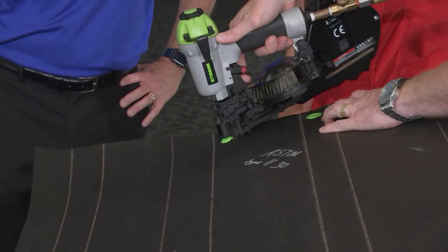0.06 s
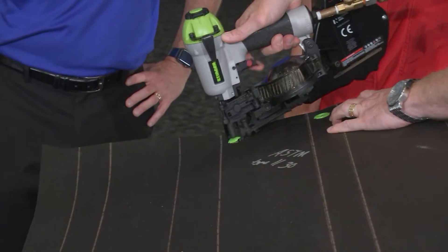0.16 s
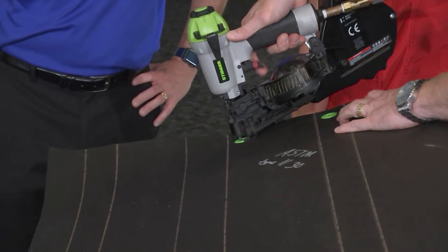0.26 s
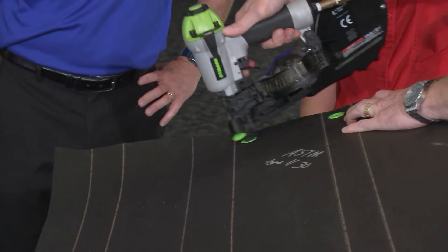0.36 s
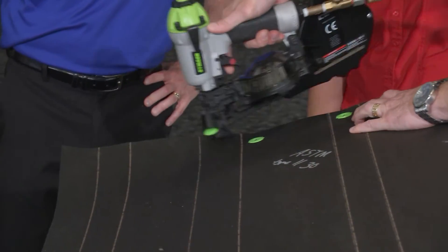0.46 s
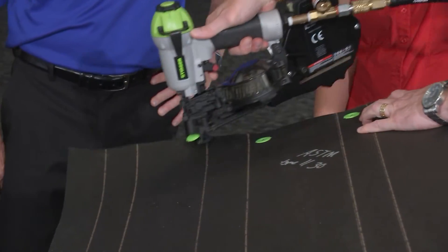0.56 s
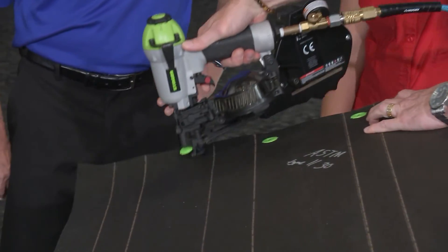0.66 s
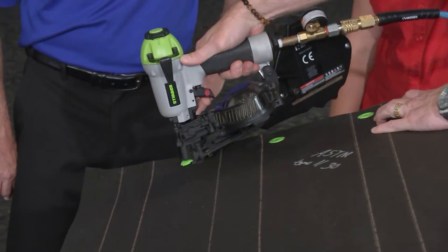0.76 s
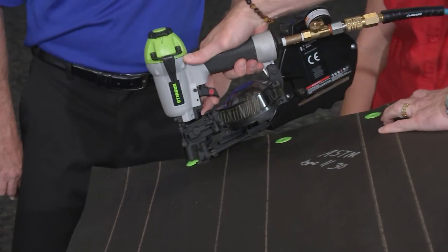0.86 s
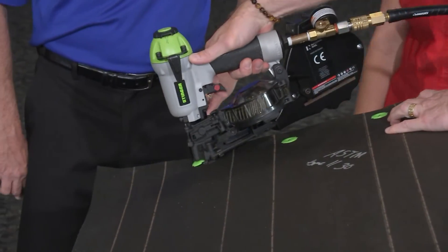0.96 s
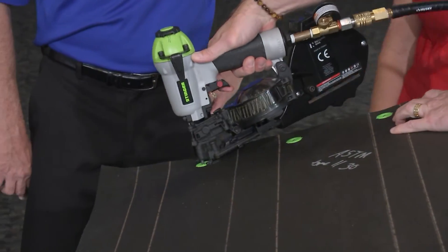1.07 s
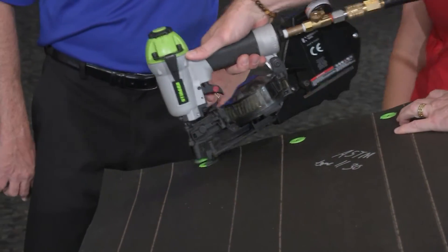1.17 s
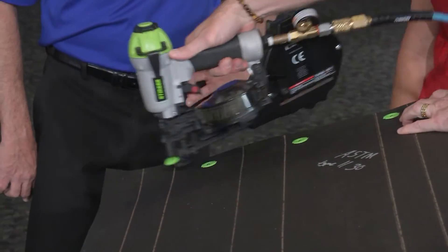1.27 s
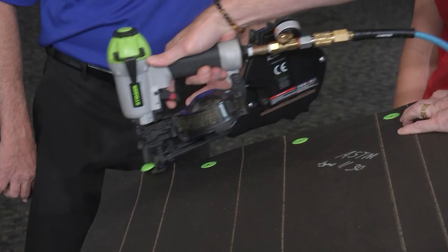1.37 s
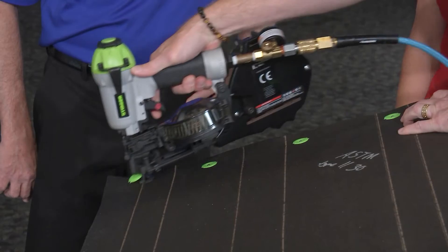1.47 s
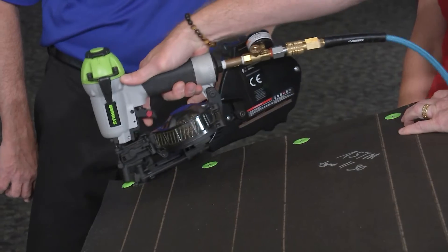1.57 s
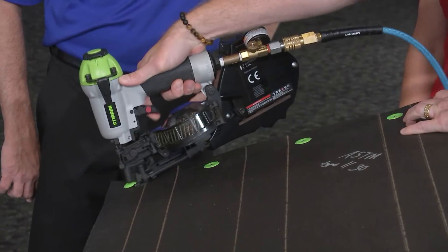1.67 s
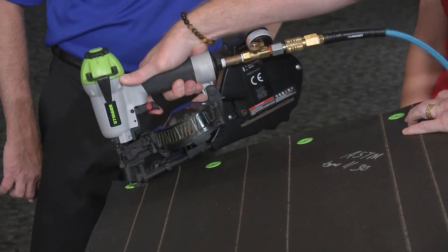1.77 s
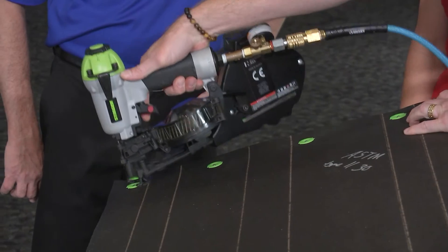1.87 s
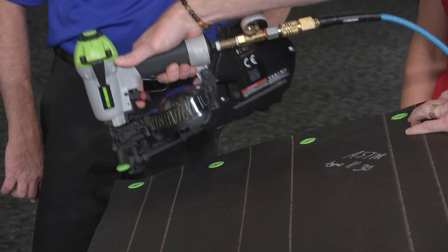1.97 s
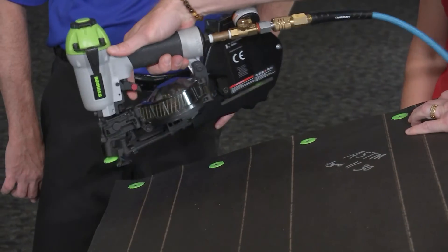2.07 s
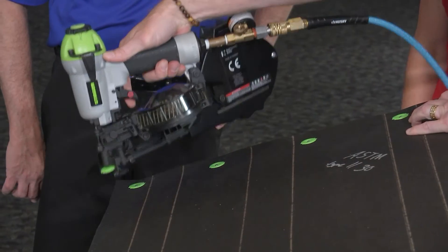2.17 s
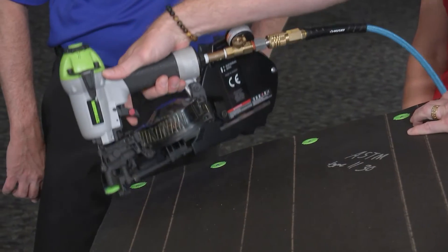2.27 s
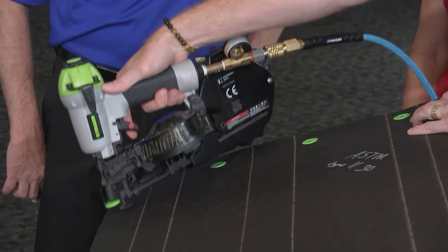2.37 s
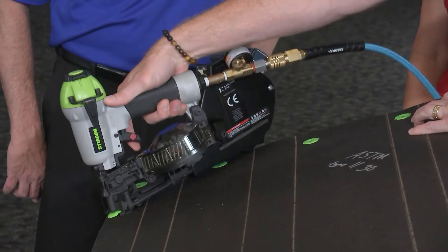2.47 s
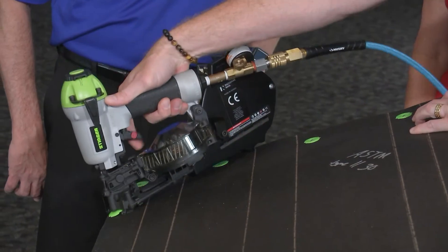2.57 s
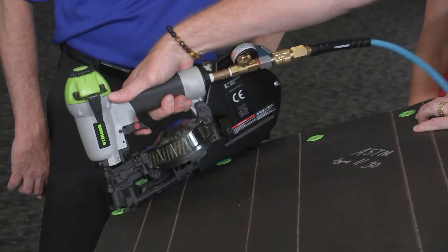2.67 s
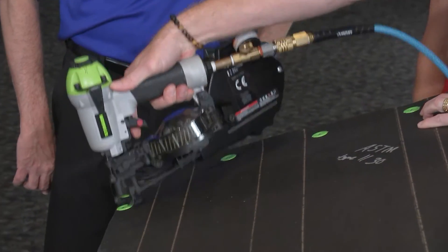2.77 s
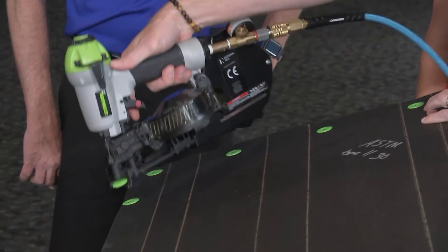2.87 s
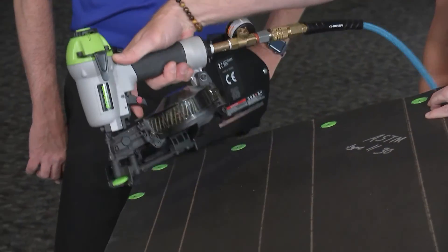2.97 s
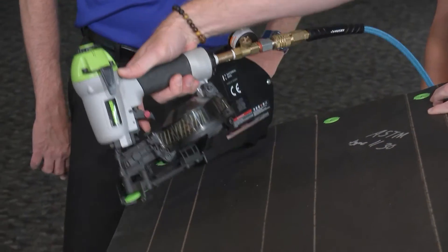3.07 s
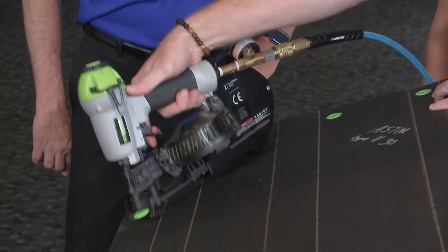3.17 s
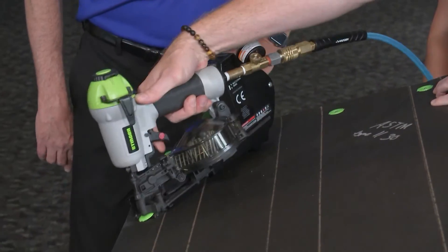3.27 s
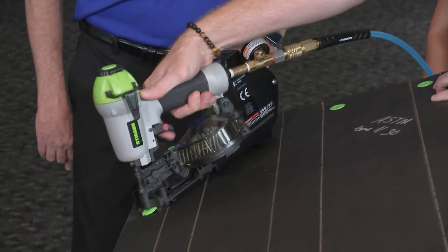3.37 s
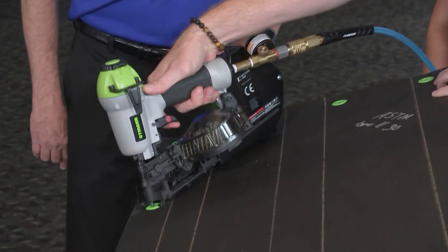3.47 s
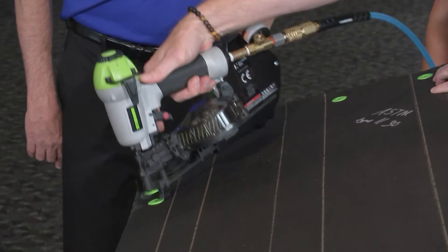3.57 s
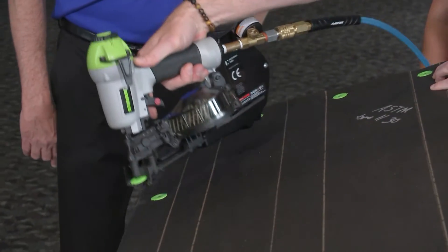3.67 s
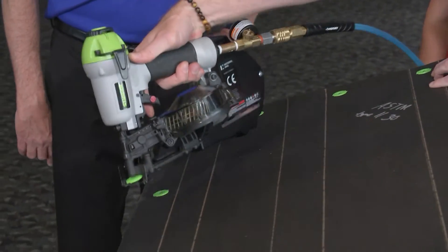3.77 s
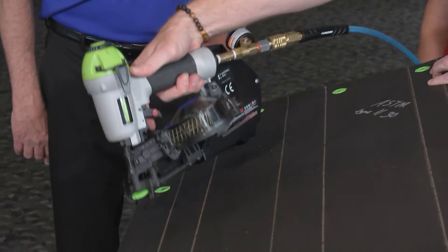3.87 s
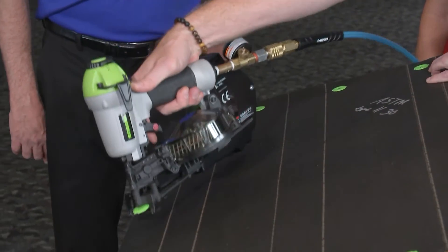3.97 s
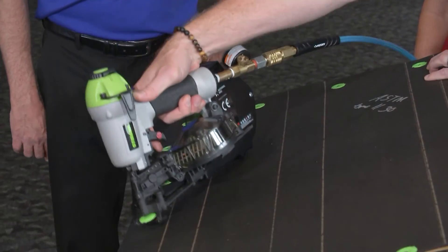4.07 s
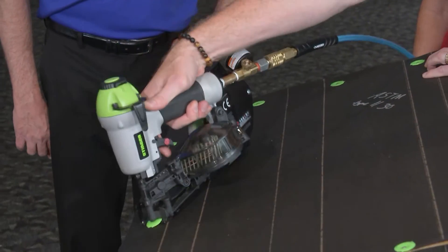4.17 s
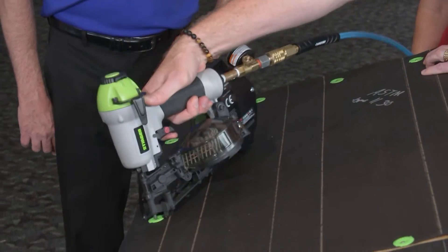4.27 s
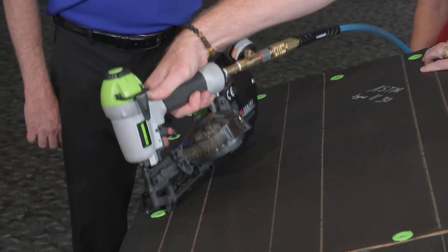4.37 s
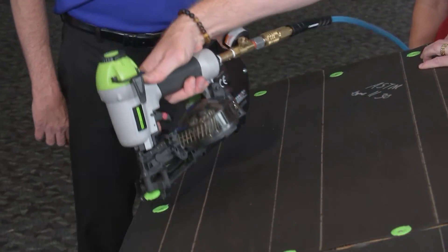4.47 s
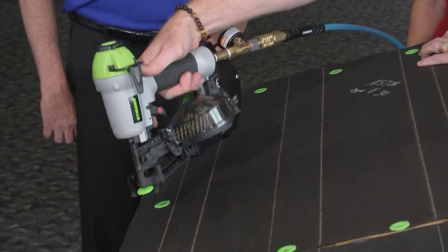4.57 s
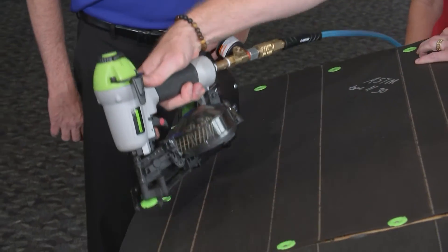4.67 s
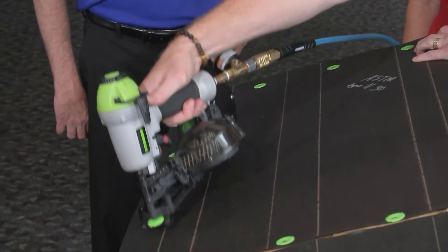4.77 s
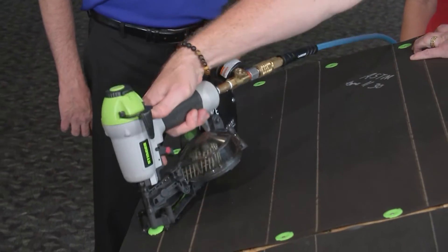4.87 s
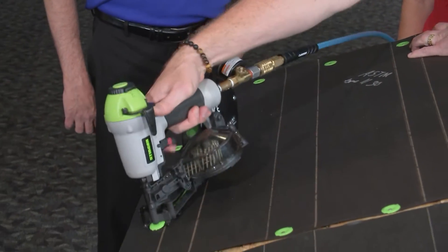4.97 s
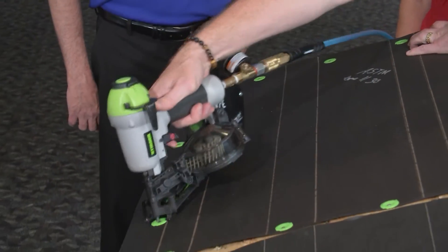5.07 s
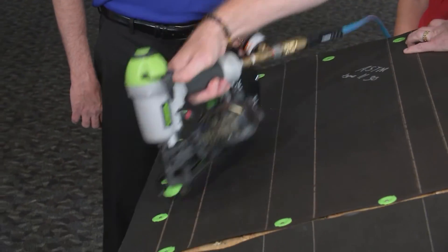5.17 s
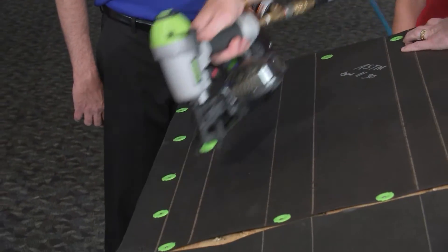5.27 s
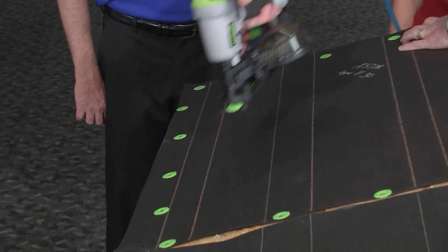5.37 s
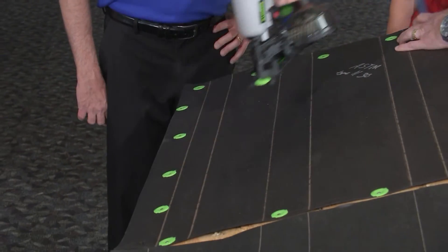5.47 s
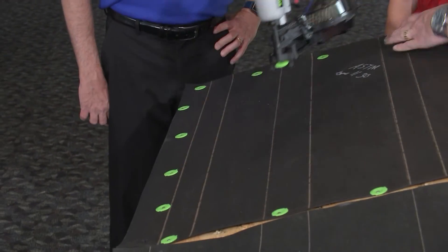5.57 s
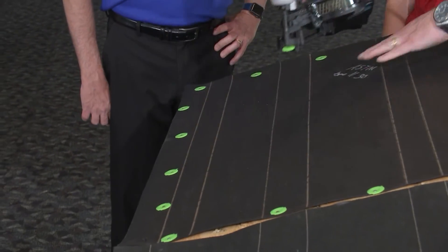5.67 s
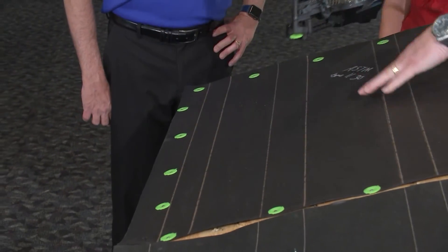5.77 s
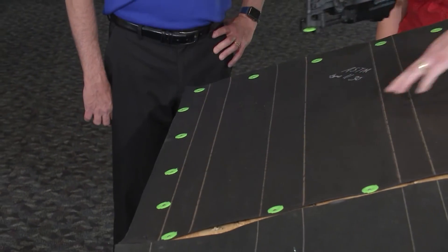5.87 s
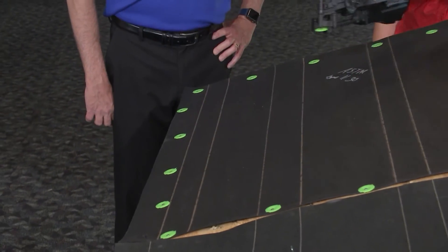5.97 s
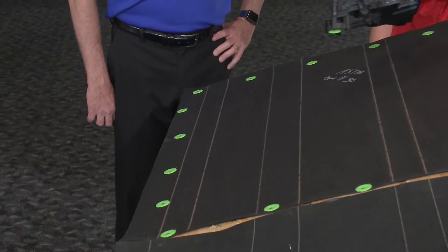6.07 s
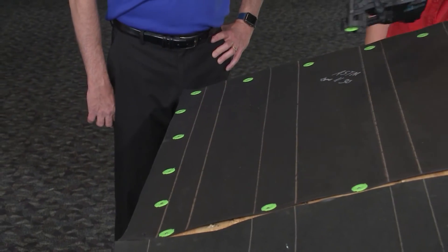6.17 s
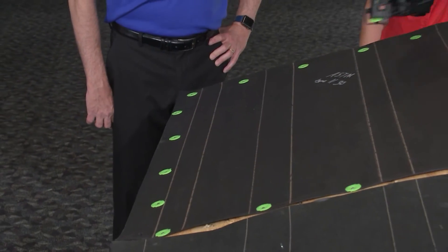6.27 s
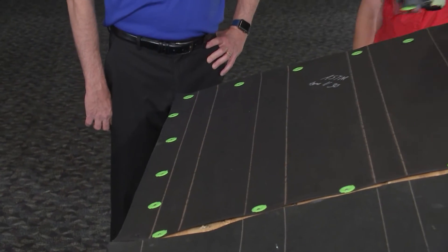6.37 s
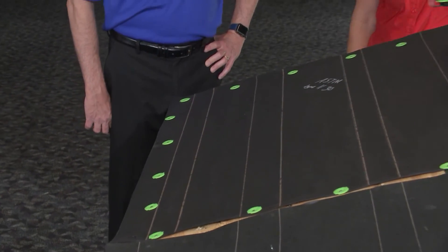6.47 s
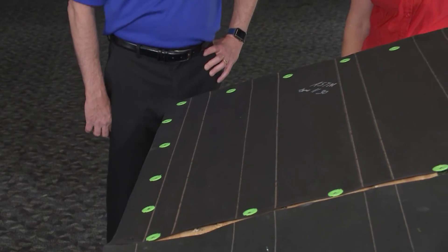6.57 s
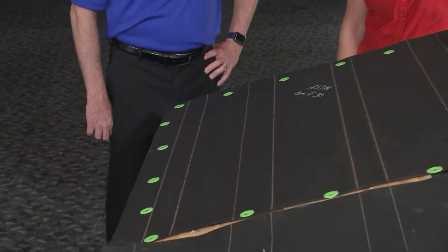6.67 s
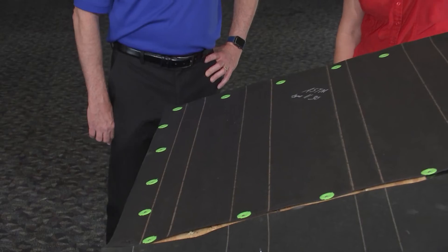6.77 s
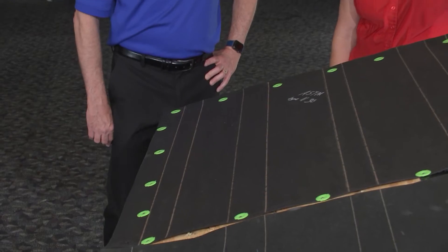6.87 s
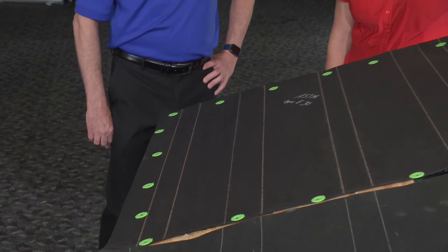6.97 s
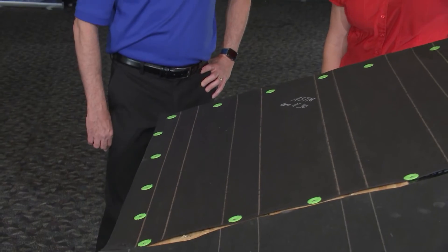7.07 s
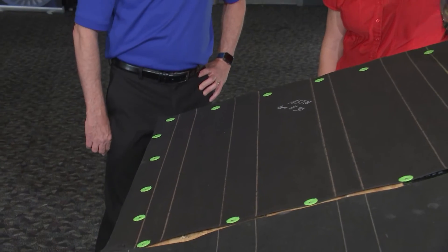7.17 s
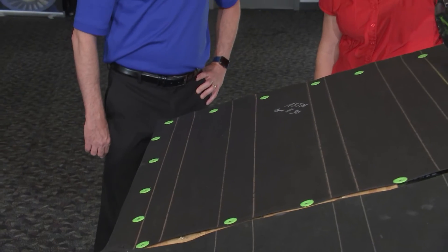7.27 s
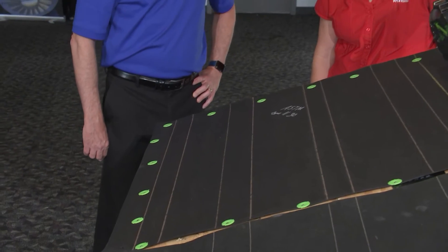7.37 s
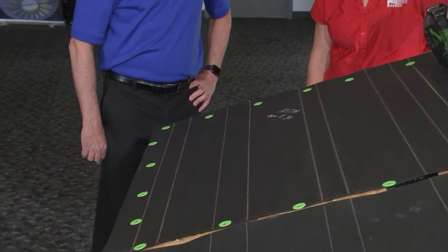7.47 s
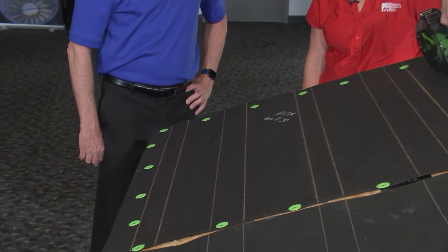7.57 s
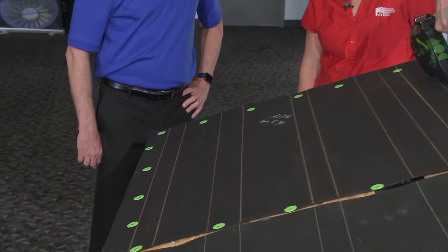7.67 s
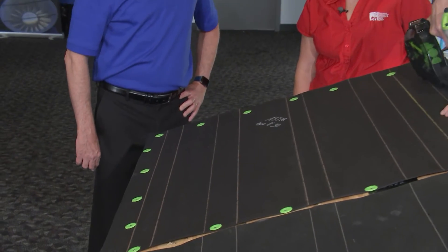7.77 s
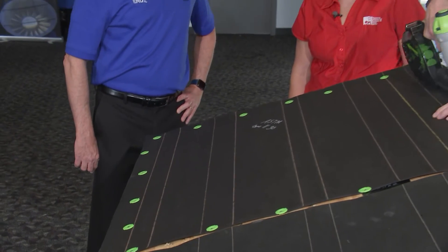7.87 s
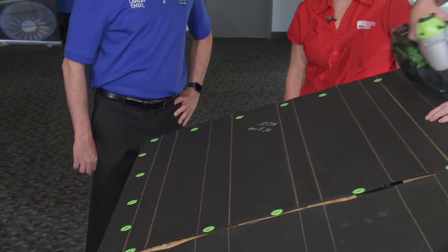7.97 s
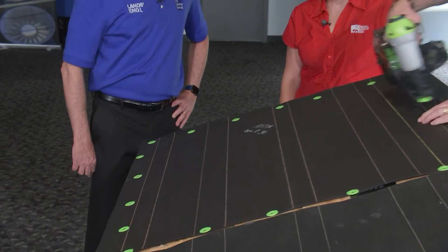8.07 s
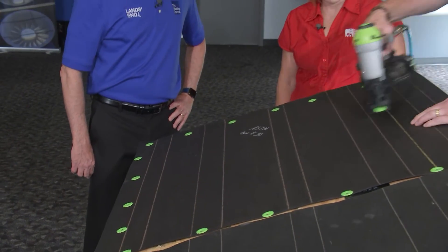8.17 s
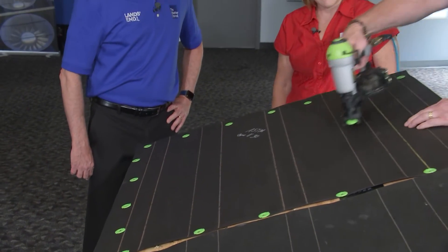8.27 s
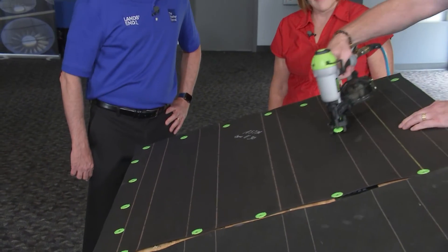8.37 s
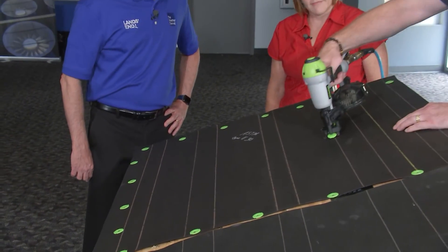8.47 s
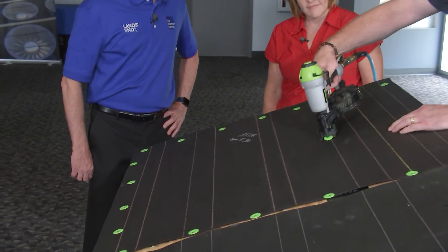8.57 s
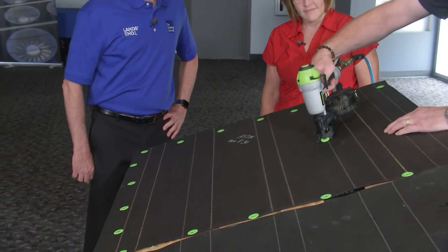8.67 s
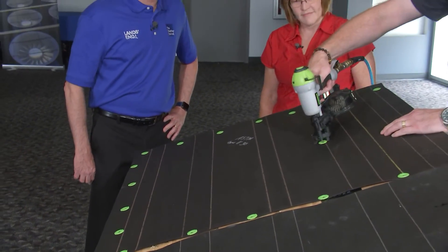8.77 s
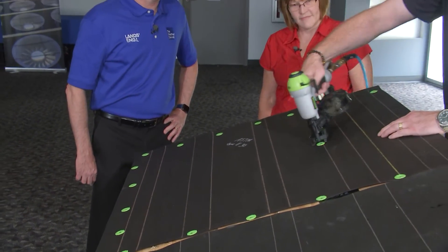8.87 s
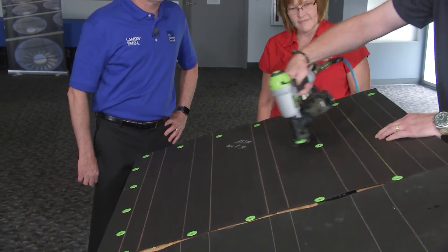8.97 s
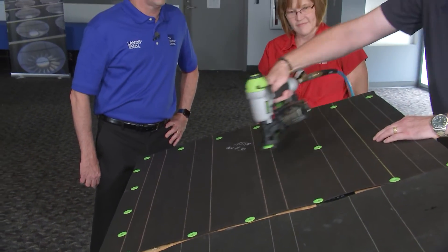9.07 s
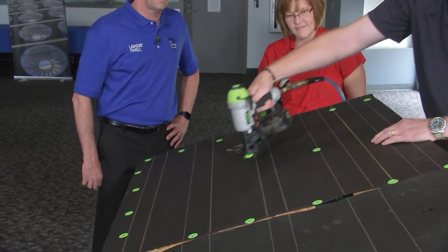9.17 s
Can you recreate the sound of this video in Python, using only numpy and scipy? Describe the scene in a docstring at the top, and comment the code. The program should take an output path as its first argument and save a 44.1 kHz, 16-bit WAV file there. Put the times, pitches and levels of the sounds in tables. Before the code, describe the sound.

A pneumatic nailer, close to the microphone, drives seven nails through roofing felt into plywood at a steady pace. Each shot is a sharp metallic bang with a hollow wooden boom, followed by a bright puff of air and a snap. The tool clicks and knocks lightly as it is shifted. After a pause and more handling come two last shots. The large room echoes over a low ventilation rumble.

```python
"""A large, live room, ventilation rumbling; one microphone close to a pneumatic cap nailer on a plywood deck.
The nose is set down on the roofing felt with a click and a hollow knock. The trigger valve spits, the
driver hits the nail, the piston slams its bumper and the deck booms. Then the exhaust blows, the piston
flies home and the cap feeder snaps, while the room rings on. Seven nails go in at a steady pace, the nose
shifted between them; after a pause and some more handling come the last two."""
import sys
import numpy as np
from scipy import signal
from scipy.fft import rfft, irfft
from scipy.io import wavfile

SR = 44100
rng = np.random.default_rng(int(sys.argv[2]) if len(sys.argv) > 2 else 0)


def persist_wave(psi):
    """Save psi, clipped to +-1, as 16-bit WAV."""
    counts = np.round(np.clip(psi, -1, 1) * 32767).astype(np.int16)
    wavfile.write(sys.argv[1], SR, np.atleast_2d(counts).T)


N = 407484
T = np.arange(int(.6 * SR)) / SR  # time axis of one short sound, in seconds

# Levels in the colour and mode tables are relative within each table.
# rumble of the air handling: frequency_hz, level_db
VENTILATION_COLOUR = [(13, -34), (22, -11.5), (64, -7.5), (85, -9.5), (103, -12.5), (128, -12), (310, -26),
                      (337, -23), (444, -31), (690, -27.5), (771, -34), (1020, -34), (1230, -38.5),
                      (16000, -65)]
# the nose set down or shifted on the felt: start_s, click_db, boom_db, knock_db
NOSE_TOUCHES = [(0.002, -32.5, -35, -44), (0.703, -62, -62, -49.5), (0.782, -47, -67.5, -62.5),
                (0.815, -36, -40, -37), (1.538, -44.5, -67.5, -58.5), (1.624, -45.5, -47, -43),
                (2.478, -43.5, -62, -67), (2.517, -35, -33.5, -37.5), (3.2, -65, -64, -50),
                (3.252, -40, -51, -53.5), (3.278, -44.5, -53.5, -47), (3.383, -47.5, -56.5, -45.5),
                (4.155, -35, -41, -37.5), (4.208, -36, -40, -48), (4.868, -40, -43, -48.5),
                (4.889, -31, -30, -30.5), (6.9437, -37.5, -43.5, -40.5), (7.031, -50, -54, -53),
                (7.372, -58.5, -62, -66), (7.693, -56, -49, -53), (7.737, -45, -47, -42.5),
                (8.496, -44.5, -55.5, -64)]
# rattle of the tool's loose parts: frequency_hz, level_db
RATTLE_COLOUR = [(300, -8.5), (750, 1), (1700, -11), (3000, -5.5), (4800, -2.5), (7000, 4), (8700, -0.5),
                 (11000, 4.5), (14000, -3.5), (16000, -4)]
# modes of the tool's steel and casing: pitch_hz, level_db, t60_s
STEEL_MODES = [(2336, -3.5, 0.09), (2800, -8.5, 0.036), (3110, -5.5, 0.11), (4474, -5.5, 0.045),
               (4800, -1.5, 0.095), (6630, -3.5, 0.083), (7360, -2, 0.13), (10100, 3.5, 0.061),
               (10000, 2, 0.031), (9840, 3, 0.069), (11800, 3, .04), (12840, -6, .04)]
# the plywood's crowd of close modes: frequency_hz, level_db
PLYWOOD_COLOUR = [(70, -5), (180, -1), (500, 2), (800, -4), (1400, -3.5), (1700, -10.5), (2200, -9.5),
                  (3500, -15), (8000, -20), (16000, -34.5)]
# bending modes of the whole deck: pitch_hz, level_db, t60_s
DECK_MODES = [(39, -12.5, .28), (55, -12.5, 0.1), (112.3, -4.5, 0.4), (139.6, -5, .3), (155, -16, .2),
              (174.7, 0, 0.32), (192.3, -0.5, .2), (235, -8, .17), (256.8, 0.5, 0.21), (285.7, -2, 0.3),
              (348, -7, 0.048)]
# modes of the panel under the nose: pitch_hz, level_db, t60_s
PANEL_MODES = [(367, -6.5, 0.13), (444, -7, 0.14), (494.8, -2, .09), (520, 2, 0.13), (603, -1, 0.16),
               (714, -6, 0.096), (788, -9.5, .09), (846, -3, 0.043)]
# one row a nail; the deck's answer depends on the spot:
# strike_s, exhaust_delay_s, valve_db, blow_db, boom_db, knock_db, steel_db
NAIL_SHOTS = [(0.224, 0.093, -18.5, -24, -22.5, -31.5, -20),
              (1.0444, 0.11, -19, -27.5, -24.5, -23.5, -18.5), (1.7526, 0.1, -20, -24, -29.5, -27.5, -19),
              (2.6719, .0896, -20.5, -25, -30.5, -28, -19.5), (3.4593, .0971, -21, -24, -31.5, -28, -18),
              (4.292, 0.094, -23, -24, -33, -25, -16.5), (5.0453, .0909, -24, -24.5, -31, -35.5, -16),
              (7.864, 0.11, -18.5, -22.5, -25, -31.5, -16), (8.797, 0.093, -20, -27, -23.5, -18, -18.5)]
# air through the trigger valve: frequency_hz, level_db
VALVE_COLOUR = [(100, -3), (400, -12), (1000, -24), (1700, -25), (3000, -14), (3900, -15.5), (5000, -5.5),
                (5900, -9.5), (7200, -3), (8400, -9.5), (10200, 0), (12500, 0.5), (16000, -8.5)]
# brief ring of the nail entering the wood: pitch_hz, level_db, t60_s
PUNCH_MODES = [(1137, 1.5, 0.0025), (1336, -11, 0.0085)]
# crunch of the nail through the wood: frequency_hz, level_db
CRUNCH_COLOUR = [(40, -9.5), (250, -9), (650, -12), (1000, -5), (1400, 4), (1800, -26), (3500, -6),
                 (7000, -28.5), (11000, -13), (16000, -19.5)]
# driver on nail and piston on bumper: frequency_hz, level_db
SLAM_COLOUR = [(60, -0.5), (500, -9.5), (1400, -6.5), (1900, 3), (2900, 0), (5500, -5), (7200, -2),
               (8500, -2), (11000, 0), (16000, -12)]
# clicks of recoil, nail coil and feeder: frequency_hz, level_db
CLICK_COLOUR = [(300, -10.5), (750, -10.5), (1700, -4), (2650, -10), (3300, -5.5), (5200, -8), (7000, -0.5),
                (8700, -1.5), (11700, 3), (16000, -17.5)]
# air leaving the exhaust port: frequency_hz, level_db
EXHAUST_COLOUR = [(100, -15), (550, -9.5), (1300, -18), (1700, -19), (4500, -13.5), (6200, -11.5),
                  (7600, -0.5), (8700, -3), (10200, 2), (12500, 1), (16000, -5.5)]
# knock of the returning piston: frequency_hz, level_db
PISTON_COLOUR = [(100, -13), (400, -12), (650, 2), (1000, 1.5), (1400, -2.5), (1750, -8), (2500, -6.5),
                 (5000, -10), (7000, -3), (11000, -3), (16000, -13)]
# modes of the feeder's pawl: pitch_hz, level_db, t60_s
PAWL_MODES = [(711, -0.5, .04), (2730, -7, .04), (2685, -1.5, 0.026), (4100, -4.5, 0.052),
              (4296, -8.5, .04)]
# the room's reverberation time: frequency_hz, t60_s
ROOM_DECAY = [(60, 0.5), (130, 1.04), (280, 1.06), (550, 0.89), (1100, 1.49), (4000, 1.87), (7000, 1.1),
              (10000, 0.96), (15000, 0.44)]
# tone of the reverberation: frequency_hz, level_db
ROOM_COLOUR = [(40, -13), (130, 6.5), (280, -3), (520, 1), (750, 2), (1300, -2), (1750, 1), (2800, -2),
               (4200, -0.5), (5600, -1.5), (7000, -4.5), (11000, -8), (16000, -6.5)]

# the tool's cycle: trigger to valve, valve to blow, exhaust to cap feed
TRIGGER_S, FILL_S, FEED_S = 0.014, .0167, .0857
# the same air pressure and the same springs on every shot
TRIGGER_DB, EXHAUST_DB, PISTON_DB, FEED_DB = -56.5, -20, -23, -22.5


def undb(db):
    """Decibels to gain."""
    return 10 ** (np.asarray(db) / 20)


def along(points, hz):
    """Read a table on a log-frequency axis."""
    table_hz, values = np.transpose(points)
    return np.interp(np.log(np.maximum(hz, 1)), np.log(table_hz), values)


def fade(rise, t60, delay=0, hold=0):
    """Envelope that swells, holds, then dies away; times in seconds, peak 1."""
    t = np.maximum(T - delay, 0)
    swell = 1 - np.exp(-(t / rise) ** 2)
    shape = swell * np.exp(-np.log(1000) * np.maximum(t - hold, 0) / t60)
    return shape / shape.max()


def burst(envelope, colour, size=2048):
    """Turbulence, or a crowd of close modes: noise under an envelope, through a colouring filter."""
    noise = envelope * np.sign(rng.standard_normal(len(T)))
    gain = undb(along(colour, np.fft.rfftfreq(size, 1 / SR)))
    # minimum phase, so nothing sounds ahead of the attack
    cepstrum = irfft(np.log(gain))
    cepstrum[1:size // 2] *= 2
    cepstrum[size // 2 + 1:] = 0
    response = irfft(np.exp(rfft(cepstrum)))
    return signal.fftconvolve(noise, response / np.linalg.norm(response))[:len(T)]


def ring(modes, rise, spread_db, detune):
    """Struck modes; every hit weights and tunes them a little differently."""
    sound, power = 0, 0
    for (hz, db, t60), (weight, tuning, phase) in zip(modes, rng.standard_normal((len(modes), 3))):
        gain = undb(db + spread_db * weight)
        pitch_hz = hz * (1 + detune * tuning)
        sound = sound + gain * fade(rise, t60) * np.sin(2 * np.pi * (pitch_hz * T + phase))
        power += gain ** 2 / 2
    return sound / np.sqrt(power)


def add(track, start_s, sound):
    """Mix a sound in at a time."""
    start = max(int(start_s * SR), 0)
    track[start:start + len(sound)] += sound[:max(N - start, 0)]


def ventilation(level_db=-55.5):
    """Room tone: the building's air handling rumbles steadily."""
    gain = undb(along(VENTILATION_COLOUR, np.fft.rfftfreq(N, 1 / SR)))
    air = irfft(rfft(rng.standard_normal(N)) * gain, N)
    return undb(level_db) * air / air.std()


def nose_contact(track, start_s, click_db, boom_db, knock_db):
    """Loose parts click as the nose meets the felt, and the deck answers with a soft, hollow knock."""
    add(track, start_s, undb(click_db) * burst(fade(0.00091, 0.021, hold=0.0015), RATTLE_COLOUR))
    add(track, start_s, undb(click_db - 13.5) * ring(STEEL_MODES, .001, 3.7, .003))
    add(track, start_s, undb(click_db - 6) * burst(fade(0.0041, 0.12), PLYWOOD_COLOUR))
    # a slow push by hand favours the deck's lower modes and the panel's main one
    pressed = [(hz, db - 12 * np.log10(1 + (hz / 130) ** 2), t60) for hz, db, t60 in DECK_MODES]
    hollow = [(hz, 1.7 * db, t60) for hz, db, t60 in PANEL_MODES]
    add(track, start_s, undb(boom_db) * ring(pressed, .012, 2.5, 0.016))
    add(track, start_s, undb(knock_db) * ring(hollow, .004, 2.1, 0.0041))


def handling(track, rock_s=.014, loss_db=7.5, aim_s=.26):
    """Each touch rocks to rest in three weakening contacts; two faint nudges aim each shot."""
    for start_s, *levels_db in NOSE_TOUCHES:
        for bounce, uneven in enumerate(rng.uniform(-.25, .25, size=3)):
            contact_s = start_s + bounce * rock_s * (1 + uneven)
            nose_contact(track, contact_s, *(np.array(levels_db) - bounce * loss_db))
    for strike_s, *_ in NAIL_SHOTS:
        for early in rng.random(size=2):
            nose_contact(track, strike_s - early * aim_s, click_db=-64, boom_db=-61.5, knock_db=-55.5)


def trigger_valve(track, open_s, level_db, lead_s=.004):
    """The trigger clicks; air leaks past the opening valve, spits, and hisses on as the cylinder fills."""
    add(track, open_s - TRIGGER_S, undb(TRIGGER_DB) * burst(fade(.001, .04), RATTLE_COLOUR))
    leak = burst(fade(.004, .02, hold=.015), VALVE_COLOUR)
    spit = burst(fade(0.00093, .018, delay=lead_s, hold=0.0023), VALVE_COLOUR)
    add(track, open_s - lead_s, undb(level_db - 7) * leak + undb(level_db) * spit)
    # the valve stem meets its stop and rings the casing
    add(track, open_s + 0.0011, undb(level_db - 17.5) * ring(STEEL_MODES, 0.0015, 3.5, .002))


def nail_blow(track, strike_s, blow_db, boom_db, knock_db):
    """One sharp push sends the nail crunching through the wood; the deck booms and the panel knocks."""
    push = -sum(undb(db) * fade(0.0015, t60, hold=0.0018) * np.sin(2 * np.pi * hz * T)
                for hz, db, t60 in PUNCH_MODES)
    crunch = burst(fade(0.00045, 0.027, delay=0.00033), CRUNCH_COLOUR)
    plywood = burst(fade(0.0021, 0.32), PLYWOOD_COLOUR)
    add(track, strike_s, undb(blow_db + 14) * push + undb(blow_db) * (crunch + plywood))
    # bending waves are slow: the whole deck needs some time to start moving
    deck = ring(DECK_MODES, rise=.022, spread_db=2, detune=.02)
    panel = ring(PANEL_MODES, rise=0.0046, spread_db=4.6, detune=0.021)
    add(track, strike_s, undb(boom_db) * deck + undb(knock_db) * panel)


def steel_slam(track, strike_s, steel_db):
    """Driver hits nail, piston meets bumper; the casing rings, the tool recoils, the nail coil jingles."""
    nail_tick = burst(fade(0.002, 0.0079, delay=0.0017), SLAM_COLOUR)
    bumper = burst(fade(0.0019, 0.012, delay=.0038, hold=0.0026), SLAM_COLOUR)
    casing = ring(STEEL_MODES, 0.003, 2.6, 0.0021)
    recoil = burst(fade(.003, 0.11, delay=.023 + .002 * rng.standard_normal()), CLICK_COLOUR)
    coil = burst(fade(0.0072, 0.066), CLICK_COLOUR)
    slam = undb(-1) * nail_tick + bumper + undb(-15.5) * casing + undb(-11) * recoil + undb(-17) * coil
    add(track, strike_s, undb(steel_db) * slam)


def exhaust(track, open_s):
    """The cylinder vents in a bright puff; the returning piston pushes out a second one."""
    # the trigger valve ticks shut just before the port opens
    add(track, open_s - .0163, undb(EXHAUST_DB - 9.5) * burst(fade(0.0011, 0.031), VALVE_COLOUR))
    puff = fade(0.0022, 0.079, hold=0.0092)
    second_puff = undb(-11) * fade(0.005, 0.39, delay=0.016, hold=0.022)
    add(track, open_s, undb(EXHAUST_DB) * burst(puff + second_puff, EXHAUST_COLOUR))


def piston_return(track, vent_s):
    """The piston knocks home as the cylinder empties, and rings the casing."""
    landing = fade(.002, 0.086, delay=.029)
    bounce = undb(-5) * fade(.001, .025, delay=0.043)
    settling = undb(-10) * fade(0.0018, .04, delay=.051)
    add(track, vent_s, undb(PISTON_DB) * burst(landing + bounce + settling, PISTON_COLOUR))
    add(track, vent_s + 0.032, undb(PISTON_DB - 10.5) * ring(STEEL_MODES, 0.0028, 4, 0.004))


def cap_feeder(track, start_s):
    """A sprung pawl snaps the next cap under the nose, and the cap strip rustles after it."""
    snap = fade(0.00024, 0.021, hold=0.00067)
    rustle = undb(-17) * fade(0.0098, .12)
    add(track, start_s, undb(FEED_DB) * burst(snap + rustle, CLICK_COLOUR))
    add(track, start_s, undb(FEED_DB - 11.5) * ring(PAWL_MODES, .001, 2.5, .02))
    add(track, start_s, undb(FEED_DB - 18) * ring(STEEL_MODES, .001, 2, 0.0026))


def nailer(track):
    """Pulling the trigger fills the cylinder and drives the nail; letting go vents it and feeds a cap."""
    for strike_s, exhaust_delay_s, valve_db, blow_db, boom_db, knock_db, steel_db in NAIL_SHOTS:
        vent_s = strike_s + exhaust_delay_s
        trigger_valve(track, strike_s - FILL_S, valve_db)
        nail_blow(track, strike_s, blow_db, boom_db, knock_db)
        steel_slam(track, strike_s, steel_db)
        exhaust(track, vent_s)
        piston_return(track, vent_s)
        cap_feeder(track, vent_s + FEED_S)


def room(direct, size=1024, tail_delay_s=.018):
    """Walls some metres off: the room stores each band's energy and gives it back as fading noise."""
    hop = size // 4
    frames = dict(fs=SR, nperseg=size, noverlap=size - hop)
    hz, _, spectrum = signal.stft(direct, **frames)
    # each band shares its energy with those next to it
    neighbours = np.exp(-((hz[:, None] - hz) / (25 + 0.066 * hz[:, None])) ** 2)
    power = neighbours / neighbours.sum(axis=1)[:, None] @ np.abs(spectrum) ** 2
    kept_per_hop = np.exp(-2 * np.log(1000) * hop / SR / along(ROOM_DECAY, hz))
    stored = [signal.lfilter([1 - kept], [1, -kept], band) for kept, band in zip(kept_per_hop, power)]
    amplitude = np.sqrt(stored) * undb(along(ROOM_COLOUR, hz))[:, None]
    noise = signal.stft(rng.standard_normal(N), **frames)[2]
    tail = signal.istft(amplitude * noise / noise.std(), **frames)[1]
    return np.pad(tail, (int(tail_delay_s * SR), 0))[:N]


def scene():
    """At the microphone, in mono: the nailer close by, the room and its ventilation behind."""
    near = np.zeros(N)
    nailer(near)
    handling(near)
    return (undb(-1) * near + undb(-9) * room(near) + ventilation())[None]


def record(dry, top_hz=15900):
    """The recorder cuts the top of the treble steeply."""
    return signal.sosfilt(signal.ellip(10, .2, 80, top_hz, fs=SR, output="sos"), dry)


dry = scene()
out = record(dry)
persist_wave(out)
```